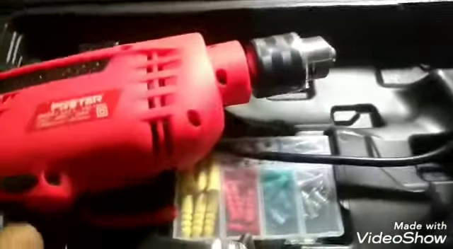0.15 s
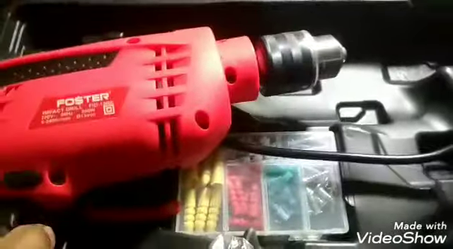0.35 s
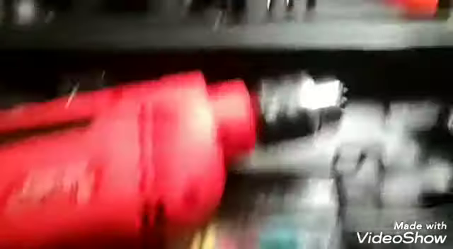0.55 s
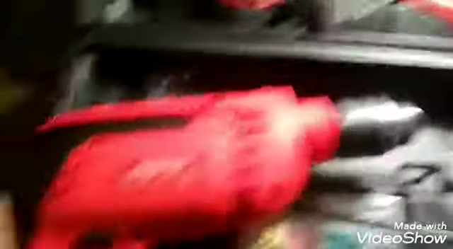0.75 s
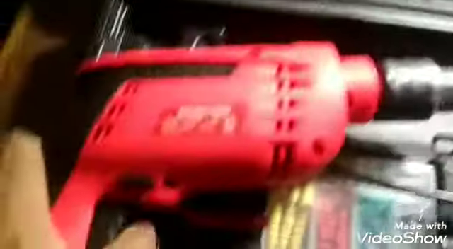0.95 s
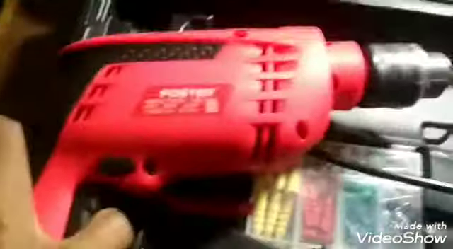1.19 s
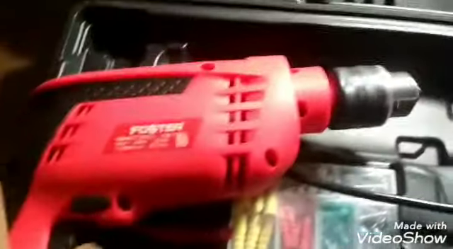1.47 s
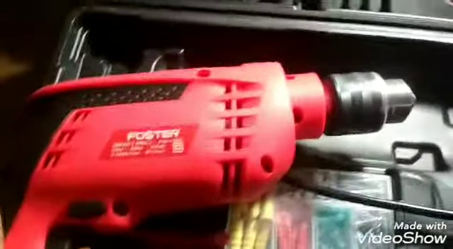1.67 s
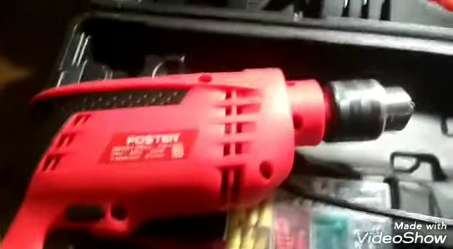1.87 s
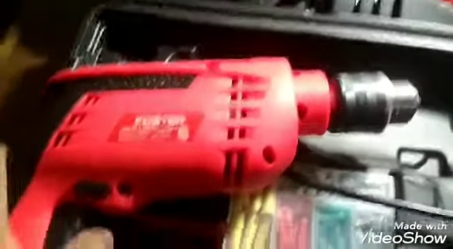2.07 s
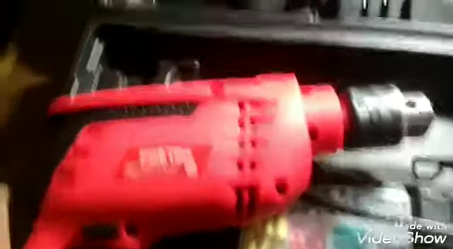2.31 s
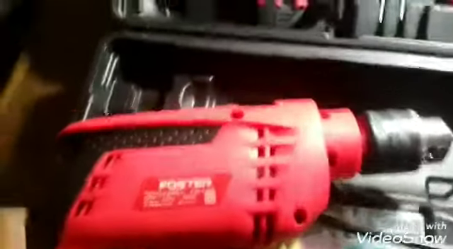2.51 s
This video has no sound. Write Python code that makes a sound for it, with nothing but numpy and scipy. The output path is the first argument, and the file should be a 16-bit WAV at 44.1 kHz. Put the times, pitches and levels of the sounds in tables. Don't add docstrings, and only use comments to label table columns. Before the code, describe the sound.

An electric drill, close and unloaded in a small room. Faint plastic clicks lead to a trigger snap at 0.17 s; the motor surges to a shrill, buzzing peak near 0.4 s, then coasts down until 1.2 s with gear rattle and chuck knocks. Short, lower growling bursts follow at 1.2, 1.55 and 1.8 s, the last strongest, whining down to rest by 2.6 s over low noise.

```python
import sys
import numpy as np
from scipy import signal
from scipy.fft import rfft, irfft
from scipy.io import wavfile
from scipy.ndimage import uniform_filter1d

SR = 44100
rng = np.random.default_rng(int(sys.argv[2]) if len(sys.argv) > 2 else 0)


def invert_db(level):
    return 10 ** (np.asarray(level, dtype=float) / 20)


def bounce(signal):
    frames = np.transpose(np.atleast_2d(signal))
    limited = np.clip(frames, -1, 1)
    pcm = np.round(limited * 32767).astype(np.int16)
    wavfile.write(sys.argv[1], SR, pcm)


N = 116865
T = np.arange(N) / SR
MAINS_HZ = 100
REF_HZ = 2120
SPEED_OFFSET_HZ, TOP_STALL_HZ = 385, 590
WOBBLE_HZ = 23

# t/s, f/Hz
BAR_RATE = [(.27, 3300), (.325, 5250), (.405, 5950), (.5, 5120), (.64, 3910), (.79, 2830), (.98, 1680),
            (1.2, 650), (1.27, 1780), (1.335, 2220), (1.545, 1170), (1.655, 2230), (1.79, 1530),
            (1.895, 3340), (2.09, 2110), (2.22, 1410), (2.38, 690)]


def speed():
    start_s, stop_s = .212, 2.601
    s, hz = np.transpose([(start_s, 1)] + list(BAR_RATE) + [(stop_s, 1)])
    return uniform_filter1d(np.interp(T, s, hz), size=1100)


# on t/s, off t/s, current level/dB, rise t/s
SQUEEZES = [
    (.172, .215, -28, .01),
    (.213, .405, 0, .075),
    (1.205, 1.33, -1, .012),
    (1.553, 1.655, -1, .012),
    (1.79, 1.9, 1, .012),
]


def current():
    release_s = .025
    total = np.zeros(N)
    for on, off, db, rise in SQUEEZES:
        ramp = np.minimum((T - on) / rise, (off + release_s - T) / release_s)
        total += invert_db(db) * np.clip(ramp, 0, 1)
    return total


# f/Hz, width f/Hz, level/dB
GEARBOX = [(1413, 410, 32.5), (1512, 190, -18), (1750, 260, -0.5), (2508, 84, -1)]
# f/Hz, width f/Hz, level/dB
SHELL = [(140, 320, -14), (280.1, 62, -6)]
# f/Hz, width f/Hz, level/dB
CASE = [(408.4, 61, -0.43), (547, 135, -1)]
# f/Hz, width f/Hz, level/dB
ROAR = [(675, 132, 1), (903, 140, 1.5), (1032, 180, -3.5)]
# f/Hz, width f/Hz, level/dB
DRAG = [(441, 60, 7), (800, 39, 4.5)]
# level/dB, slope/dB per octave of speed, change/dB at full current, stall f/Hz
GEAR_LAW = (-39, 5, 4, 406)
SHELL_LAW = (-43.5, -1.5, -0.5, 272.5)
GROWL_LAW = (-54.5, 8.5, 9, 85)
ROAR_LAW = (-51.5, 13, 2, 85)
DRAG_LAW = (-58, -3, -5, 95.5)
# f/Hz, level/dB
GRIND = [(150, -38.5), (300, 5.5), (500, 2), (1000, 4), (1500, -4.5), (2200, 2.5), (3800, -21),
         (6000, -43.5)]


def rattle(hz, amps):
    grind = evened(colour(taps(amps, wobble_db=1.5), GRIND))
    out = invert_db(-34.5) * amps * grind
    drive = taps(amps, wobble_db=1.2)
    parts = ((GEARBOX, GEAR_LAW), (SHELL, SHELL_LAW), (CASE, GROWL_LAW), (ROAR, ROAR_LAW), (DRAG, DRAG_LAW))
    for peaks, law in parts:
        out = out + ring(drive, peaks) * level(law, hz, amps)
    return out


def taps(amps, wobble_db):
    taps_per_s, spread_db = 1500, 3
    strength = invert_db(spread_db * np.minimum(rng.exponential(1, N), 3))
    hits = strength * (rng.random(N) < taps_per_s / SR)
    sides = hits * rng.choice([-1., 1.], (2, N))
    return sides * chop(amps, 0.7) * invert_db(wobble_db * drift(WOBBLE_HZ))


def chop(amps, depth):
    sharpness = 1.2
    phase = T * MAINS_HZ % 1
    bump = (4 * phase * (1 - phase)) ** (2 * sharpness)
    return 1 + depth * np.clip(amps, 0, 1) * ((1 + sharpness) * bump - 1)


# multiple, level/dB
WHINE = [(1, -43), (2, -49), (3, -42), (4, -40.5), (5, -44), (6, -45.5), (7, -47.5), (8, -49.5), (9, -51),
         (10, -52)]
# f/Hz, level/dB
VENT = [(800, -25), (2000, -9), (3200, -2), (5300, 2.5), (6900, -5), (9500, 0), (11500, 2), (15000, 2)]


def whine(hz, amps):
    width_hz, flutter_db, loaded_db = 55, 2, -3.5
    smear_depth, smear_hz = .55, 170
    mesh_ratio, mesh_db = .525, -33.5
    turns = np.cumsum(hz + width_hz / 3 * drift(130.3)) / SR
    alive = spin(hz, TOP_STALL_HZ)
    lines = [(k, invert_db(db + loaded_db * amps * (k > 1)) * alive) for k, db in WHINE]
    lines.append((mesh_ratio, invert_db(mesh_db) * amps * hz / hz.max()))
    out = np.zeros((2, N))
    for k, gain in lines:
        smear = smear_depth * (min(k / 3, 1) if k >= 1 else 1.1)
        chance = np.array([drift(smear_hz) + 1j * drift(smear_hz) for _ in out]) / np.sqrt(2)
        rough = np.sqrt(1 - smear ** 2) + smear * chance
        tone = rough * np.exp(2j * np.pi * (k * turns + rng.random((2, 1))))
        vent = invert_db(read(VENT, k * hz) + flutter_db * drift(WOBBLE_HZ))
        out += np.sqrt(2) * gain * vent * (k * hz < 17000) * tone.real
    return out


# f/Hz, level/dB per Hz
HISS = [(45, -36), (90, -12.5), (500, -13), (1500, -10.5), (4500, -12.5), (7300, -19.5), (10500, -11.5),
        (15000, -19.5)]
# level/dB, slope/dB per octave of speed, change/dB at full current, stall f/Hz
HISS_LAW = (-34, 3.5, 0, 289)


def hiss(hz, amps):
    noise = evened(patchy(colour(rng.standard_normal((2, N)), HISS)))
    noise = noise * invert_db(drift(49) + 2.35 * drift(3.3))
    top = signal.sosfiltfilt(signal.butter(2, 6500, "high", fs=SR, output="sos"), noise)
    top_gain = invert_db(-1.5 * amps) * spin(hz, TOP_STALL_HZ) + 0.11 * amps + 0.021
    return chop(amps, 0.06) * level(HISS_LAW, hz, amps) * (noise - top + top * top_gain)


def patchy(x):
    z = signal.stft(x, nperseg=512)[2]
    field = rng.standard_normal(z.shape[1:])
    field = uniform_filter1d(uniform_filter1d(field, size=5, axis=0), size=7, axis=1)
    return signal.istft(z * invert_db(2.5 * evened(field)), nperseg=512)[1][:, :N]


# t/s, level/dB, ring f/Hz
KNOCKS = [(0.219, -26.5, 773), (0.243, -18, 1490), (0.293, -11, 1480), (0.322, -8.5, 891),
          (0.339, -10.5, 910), (0.36, -23, 1330), (0.563, -30, 1490), (0.625, -17, 1450),
          (0.718, -30, 1490), (0.758, -23, 1420), (0.801, -14, 1470), (0.838, -25, 1350),
          (0.859, -19, 1460), (0.882, -15, 1460), (0.942, -24, 1340), (1.003, -17, 1430),
          (1.093, -28, 1450), (1.102, -24, 1390), (1.22, -14.5, 1540), (1.273, -13.5, 1400),
          (1.343, -17, 1340), (1.408, -16.5, 1490), (1.459, -18, 1530), (1.477, -16.5, 1470),
          (1.536, -21.5, 1390), (1.565, -15.5, 1480), (1.595, -14.5, 1350), (1.624, -18.5, 1450),
          (1.73, -16.5, 1490), (1.796, -14, 1420), (1.817, -14, 1520), (1.837, -27, 1400),
          (1.864, -24.5, 1350), (1.968, -26.5, 1460), (1.989, -30.5, 1490), (2.002, -17, 1440),
          (2.079, -30.5, 1430), (2.106, -17.5, 1380), (2.163, -39, 1460), (2.244, -19.5, 1480),
          (2.361, -31, 953), (2.376, -54, 1460), (2.426, -35, 1330)]


def knocks():
    t60_s, trim_db, crack_db = 0.085, -7, -5
    size = 2500
    out, t = np.zeros(N), np.arange(size) / SR
    crack_band = signal.butter(2, [1800, 4500], "band", fs=SR)
    for s, db, hz in KNOCKS:
        noise = rng.standard_normal(size)
        second_hz = hz * (1 + .08 * noise[0])
        rings = np.sin(2 * np.pi * hz * t) + .6 * np.sin(2 * np.pi * second_hz * t + noise[1])
        crack = evened(signal.lfilter(*crack_band, noise)) * invert_db(crack_db - 60 * t / t60_s)
        fade = invert_db(db + trim_db - 60 * t / t60_s) * np.minimum(t * 500, 1)
        out[round(s * SR):][:size] += fade * (.7 * rings + crack)
    return out


# multiple of 100 Hz, level/dB
HUM = [(1, -39), (2, -54), (3, -76.5), (4, -41.5)]


def hum(hz, amps):
    buzz = np.zeros(N)
    for k, db in HUM:
        sway = invert_db(db + 0.32 * k * drift(3.7))
        buzz += np.sqrt(2) * sway * np.sin(2 * np.pi * (k * MAINS_HZ * T + rng.random()))
    return amps * buzz * invert_db(-2.2 * hz / REF_HZ)


# t/s, level/dB, ring f/Hz, t60/s
CLICKS = [(.0423, -39.5, 10500, .015), (.0423, -58, 3600, 0.02), (0.0515, -42.5, 3800, 0.027),
          (0.0527, -57.5, 1700, .05), (.068, -59, 4200, 0.045), (.077, -51, 3700, .03),
          (0.083, -43, 683, 0.074), (.097, -60, 3700, .04), (.104, -50.5, 750, 0.042),
          (.108, -56, 4500, 0.033), (0.136, -51, 250, 0.055), (0.1542, -40.5, 800, 0.067),
          (.1535, -43, 4200, .015), (0.167, -45.5, 4500, .02), (.173, -19, 7100, 0.024),
          (.173, -29, 3300, 0.021), (.181, -47, 750, 0.052), (0.204, -39.5, 760, 0.05)]


def clicks():
    size = 1800
    out, t = np.zeros(N), np.arange(size) / SR
    for s, db, hz, t60_s in CLICKS:
        b, a = signal.iirpeak(hz, 1.4, SR)
        tick = evened(signal.lfilter(b, a, signal.lfilter(b, a, rng.standard_normal(size))))
        fade = invert_db(db - 13 - 60 * t / t60_s) * np.minimum(t / 0.0012, 1)
        out[round(s * SR):][:size] += tick * fade
    return out


def room(x):
    size, t60_s = SR // 3, .3
    t = T[:size]
    sparse = rng.choice([-1., 1.], (2, size)) * (rng.random((2, size)) < .06) * (t > .002)
    tail = sparse * invert_db(-60 * t / t60_s)
    tail = tail / np.linalg.norm(tail, axis=1)[:, None]
    return invert_db(-11) * signal.fftconvolve(x[None], tail, axes=1)[:, :N]


# f/Hz, level/dB per Hz
FLOOR = [(18, 1), (30, -1.5), (117, -13.5), (455, -47), (747, -26), (1260, -39), (15500, -41)]


def noise_floor():
    return np.array([invert_db(-71.5) * evened(colour(rng.standard_normal(N), FLOOR)) for _ in range(2)])


def evened(x):
    return x / np.sqrt(np.mean(x ** 2) + 1e-20)


def read(points, hz):
    f, value = np.transpose(points)
    return np.interp(np.log(hz + 1), np.log(f + 1), value)


def colour(x, points, scale=1, lag_s=0):
    hz = np.fft.rfftfreq(N, 1 / SR)
    gain = invert_db(scale * read(points, hz))
    return irfft(rfft(x) * gain * np.exp(-2j * np.pi * hz * lag_s), N)


def ring(x, peaks):
    out = 0
    for hz, width, db in peaks:
        b, a = signal.iirpeak(hz, hz / max(0.95 * width, 10), SR)
        out = out + invert_db(db) * evened(signal.lfilter(b, a, signal.lfilter(b, a, x)))
    return evened(out)


def drift(rate_hz):
    return evened(signal.lfilter(*signal.butter(2, rate_hz, fs=SR), rng.standard_normal(N)))


def spin(hz, stall_hz):
    return hz ** 2 / (hz ** 2 + stall_hz ** 2)


def level(law, hz, amps):
    db, per_octave_db, power_db, stall_hz = law
    alive = spin(hz, stall_hz)
    gain = invert_db(db + per_octave_db * np.log2((hz + SPEED_OFFSET_HZ) / REF_HZ) + power_db * amps)
    return gain * (alive + 0.47 * amps * (1 - alive))


# f/Hz, share
SAME = [(60, 0.67), (500, 1), (1000, 1), (2000, 0.048), (4000, 0.042), (15000, 0.063)]
# f/Hz, level/dB
BALANCE = [(60, 9.5), (200, 1), (700, 3), (1400, 0), (3000, 8), (5000, 9), (8500, -3), (15000, -5.5)]


def scene():
    hz, amps = speed(), current()
    drill = rattle(hz, amps) + whine(hz, amps) + hiss(hz, amps)
    near, far = drill + knocks() + hum(hz, amps) + clicks()
    same = np.clip(read(SAME, np.fft.rfftfreq(N, 1 / SR)), 0, 1)
    other = irfft(same * rfft(near) + np.sqrt(1 - same ** 2) * rfft(far), N)
    wet = room(near)
    left = colour(near + wet[0], BALANCE, 0.4, lag_s=8 / 44100)
    right = colour(other + wet[1], BALANCE, -0.59)
    return invert_db(-1.5) * np.array([left, right]) + noise_floor()


def top_cut(x):
    return signal.sosfilt(signal.butter(12, 16240, fs=SR, output="sos"), x)


def record(dry):
    edge = signal.firwin(301, 15450, window=("kaiser", 8), fs=SR)
    mix = signal.oaconvolve(dry, edge[None], "same")
    return top_cut(mix)


dry = scene()
out = record(dry)
bounce(out)
```